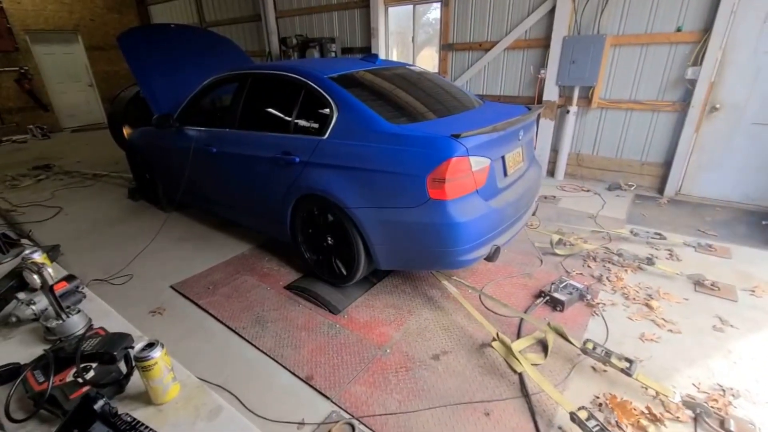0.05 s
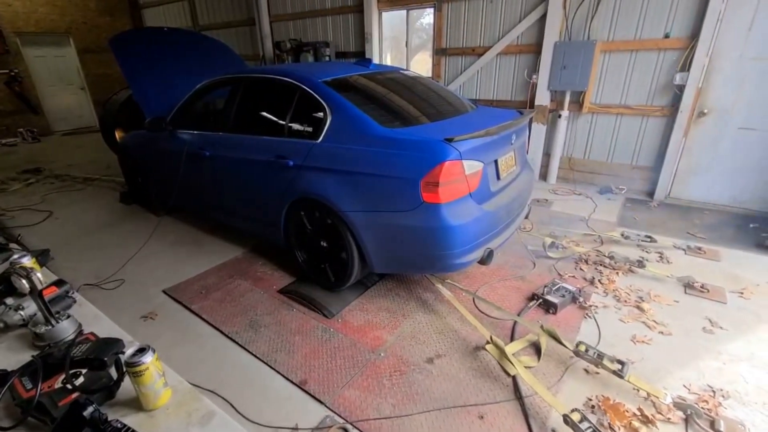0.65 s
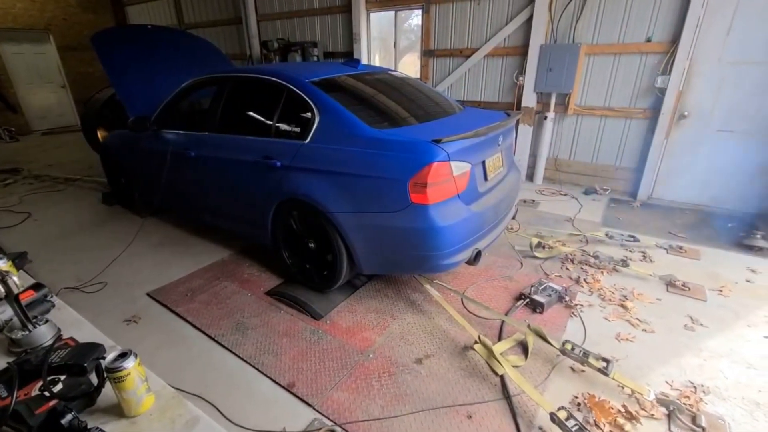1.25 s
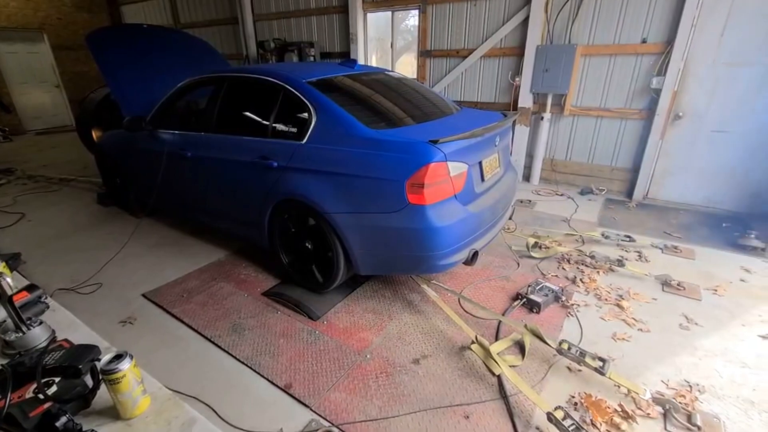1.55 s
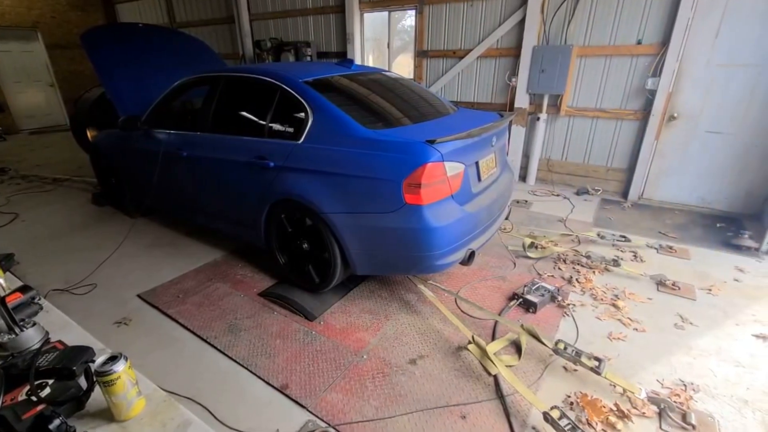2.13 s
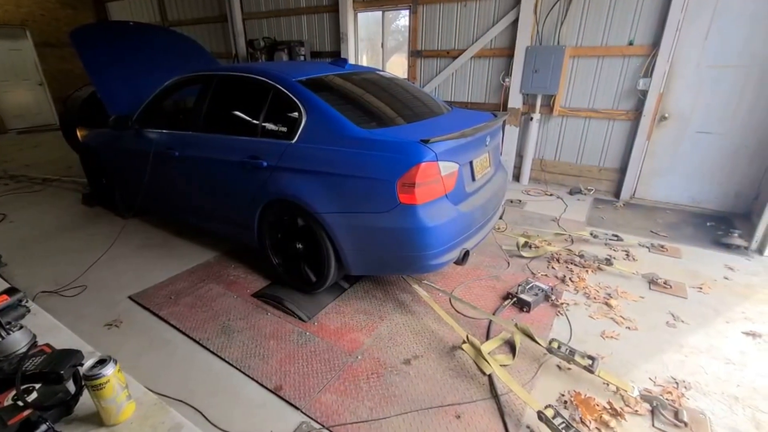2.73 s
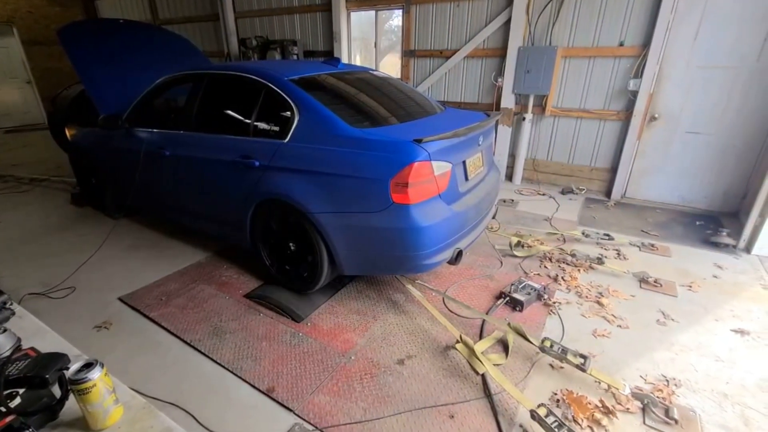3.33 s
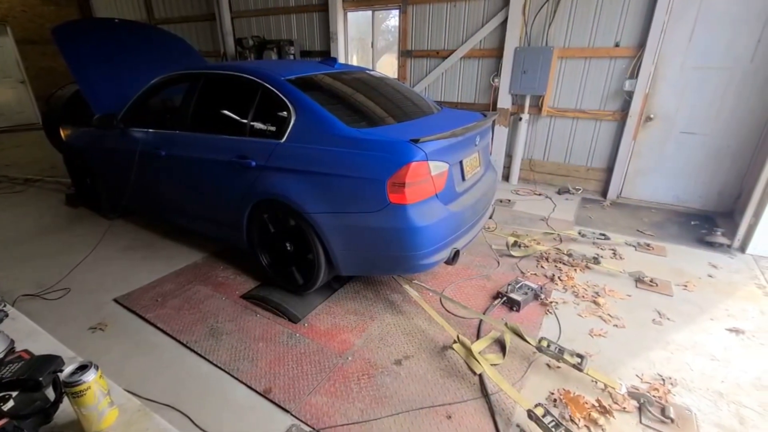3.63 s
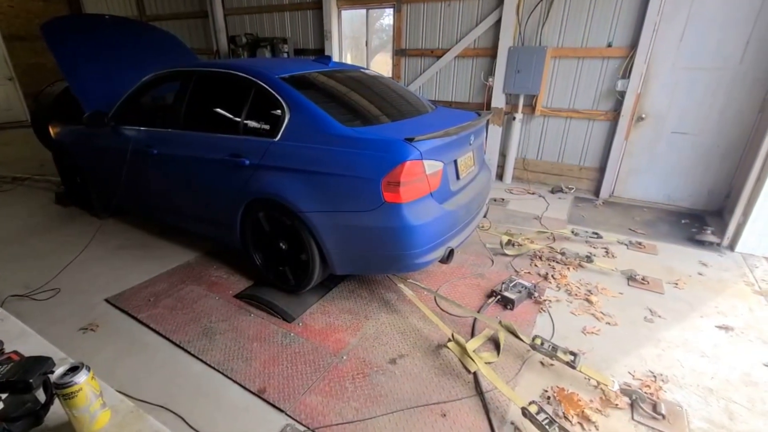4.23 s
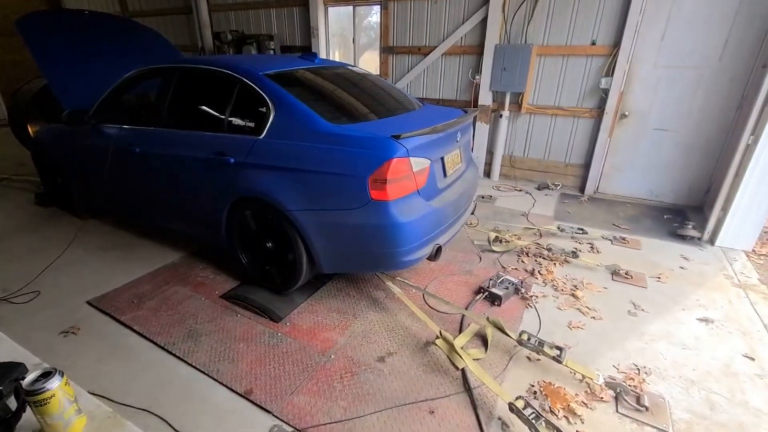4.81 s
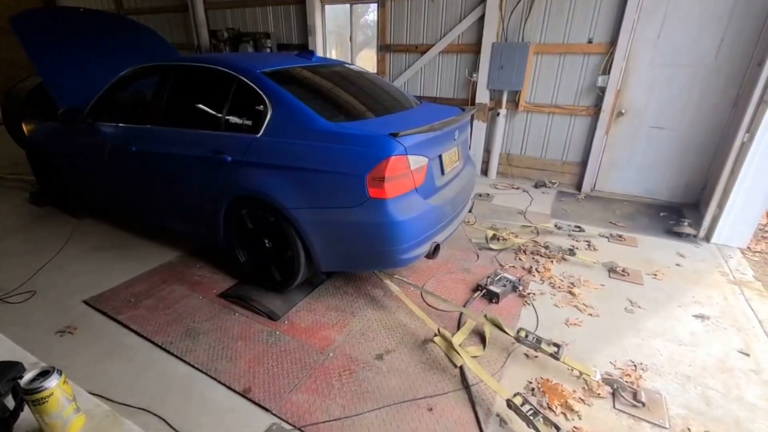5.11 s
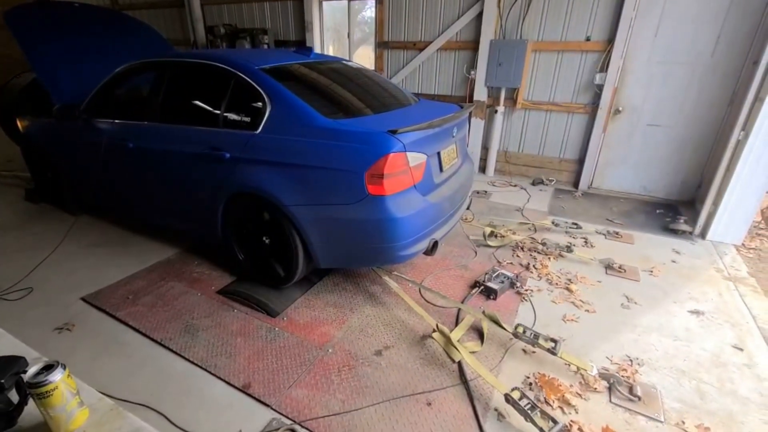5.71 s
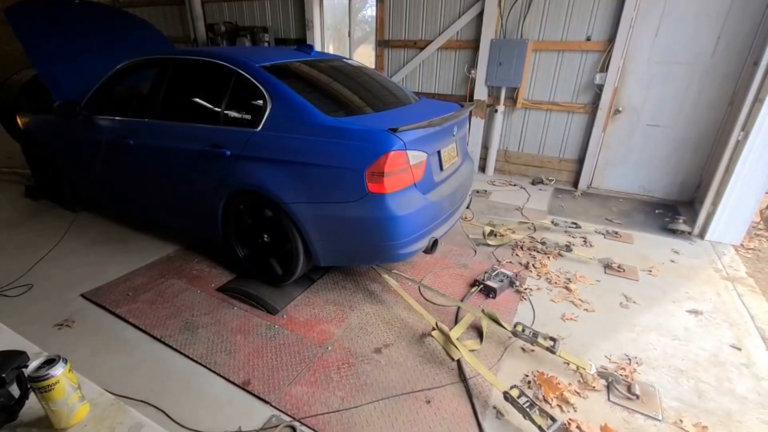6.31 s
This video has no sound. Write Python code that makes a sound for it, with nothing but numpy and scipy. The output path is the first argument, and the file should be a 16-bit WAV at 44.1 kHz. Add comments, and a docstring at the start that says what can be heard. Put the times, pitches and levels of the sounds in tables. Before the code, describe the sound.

A turbocharged car engine runs throughout on test rollers inside a metal shed, heard close to the tailpipe. The exhaust is deep, booming and burbling, with resonances that swell as the pitch moves. From the start the revs rise, with a hard rasp, to a peak at about 1.1 seconds, then sag until 1.7 seconds. They rise again, rasping, to about 2.7 seconds and drop quickly to their lowest near 3.2 seconds. From there the engine climbs slowly and steadily under load, growing raspier toward the end. A soft hiss of intake air, rollers and puffing exhaust gas lies underneath, along with a faint, high, airy turbo whistle that is strongest between roughly 2.4 and 5 seconds. At about 6 seconds a short chuff opens into a brighter rush of air, which continues over the still-rising engine until about 6.4 seconds.

```python
"""A metal shed, microphone hand-held beside the tailpipe of a turbocharged straight-six on a chassis dyno.
The revs flare and sag twice, then climb steadily under load. The firing orders boom through the
standing waves of pipe and shed, uneven cylinders burble, and the exhaust rasps with the throttle.
Gas puffs from the pipe over the hiss of intake and rollers and a faint turbo whistle.
Near the end a rush of boost air breaks in with a chuff."""
import sys
import numpy as np
from scipy import signal
from scipy.fft import rfft, irfft
from scipy.io import wavfile
from scipy.ndimage import uniform_filter1d

SR = 44100
rng = np.random.default_rng(int(sys.argv[2]) if len(sys.argv) > 2 else 0)


def wrap_up_sound(samples):
    """Save the sound to the file named by the first command line argument, as 16-bit audio."""
    columns = np.atleast_2d(samples).T
    # keep every value between -1 and 1, then stretch to whole-number steps
    tamed = np.clip(columns, -1, 1)
    steps = np.round(tamed * 32767).astype(np.int16)
    wavfile.write(sys.argv[1], SR, steps)


N = 280476
TIME = np.arange(N) / SR
BINS = np.fft.rfftfreq(N, 1 / SR)

# engine speed, six firings to a cycle: time_s, firing_hz
FIRING_RATE = [(0.0, 82.8), (0.43, 97.96), (0.85, 114.5), (0.95, 117.1), (1.14, 122.3), (1.32, 115.4),
               (1.5, 97.7), (1.69, 90.9), (2.09, 100.5), (2.15, 101.9), (2.67, 112.1), (2.75, 110.9),
               (3.09, 82.7), (3.17, 79.77), (3.34, 81.82), (4.25, 85.63), (4.76, 90.78), (5.63, 98.38),
               (6.36, 105.8)]
# throttle, as the level it gives the rasp: time_s, level_db
THROTTLE = [(0.0, -34), (0.2, -30), (0.52, -31.5), (0.7, -25), (0.95, -26), (1.3, -31), (1.55, -31.7),
            (2.05, -32), (2.32, -25.5), (2.85, -25), (3.15, -31), (4.35, -31.3), (4.7, -28.2), (4.9, -31.5),
            (5.17, -29), (5.42, -31.9), (5.75, -29), (5.98, -25.4), (6.36, -24)]
# colour of gas leaving the tailpipe: frequency_hz, gain_db
JET_COLOUR = [(1200, -0.5), (1900, -5.5), (2300, -2), (3000, -7.5), (3700, -9.5), (4600, -19), (7000, -55)]
# colour of intake and rollers before the long pull: frequency_hz, gain_db
HISS_COLOUR = [(2500, -1), (4600, -1.5), (5800, 0.5), (6900, 2), (7400, -8), (8000, -5), (8600, -3),
               (9100, 5.5), (9700, 0.5), (10400, 3), (12100, 0), (12900, 0.5), (14500, -1.5), (15800, -23)]


def amp(db):
    """Decibels to gain."""
    return 10 ** (np.asarray(db) / 20)


def unit(x):
    """Scales to rms 1."""
    return x / np.sqrt(np.mean(x ** 2) + 1e-20)


def curve(rows):
    """A time table, at every sample."""
    return np.interp(TIME, *np.transpose(rows))


def across(points):
    """A frequency table, at every bin."""
    hz, value = np.transpose(points)
    return np.interp(np.log(BINS + 1), np.log(hz), value)


def wander(hz):
    """Random drift of rms 1, up to about the given rate."""
    return unit(irfft(rfft(rng.standard_normal(N)) * np.exp(-(BINS / hz) ** 2), N))


def noise_pair():
    """Two independent white noises."""
    return rng.standard_normal((2, N))


def resonances(modes):
    """Gain at every bin of a set of modes, added in power."""
    return np.sqrt(sum(amp(db) ** 2 / (1 + 2 * ((BINS - hz) / width) ** 2) ** 2
                       for hz, width, db in modes))


def ring(x, gain):
    """Filters at minimum phase, so that each resonance builds up and rings on."""
    cepstrum = irfft(np.log(gain + amp(-90)), N)
    causal = cepstrum * (1 + np.sign(np.fft.fftfreq(N)))
    response = irfft(np.exp(rfft(causal)), N)[:SR // 2]
    running = np.pad(x, ((0, 0), (len(response) - 1, 0)), "reflect")  # already ringing at the start
    return signal.oaconvolve(running, response[None], "valid", axes=1)


def microphone(pair, colour, left_db=0):
    """Colours a direct and a scattered wave and spreads them over two ports; the middle has rms 1."""
    # how alike left and right are: frequency_hz, coherence
    port_likeness = [(100, 1), (350, .96), (600, .72), (1100, .65), (2200, .48), (4500, .45), (9000, .64),
                     (15000, .68)]
    # left level over right: frequency_hz, balance_db
    port_balance = [(100, -2), (200, 6), (380, -7), (650, 3), (1200, 0), (2300, -1), (4500, 3), (8500, 1),
                    (12000, 8), (15000, 7.5)]
    # the left port hears the car a little later: frequency_hz, lag_rad
    port_lag = [(20, .015), (100, .08), (380, .29), (1000, .62), (2300, 1.45), (4400, 1.8), (9000, 1.5),
                (15000, 1.55)]
    direct, scattered = rfft(pair) * colour
    likeness = np.clip(across(port_likeness), 0, 1)
    lean = amp((across(port_balance) + left_db) / 2)
    shared = np.sqrt((1 + likeness) / 2) * direct
    apart = np.sqrt((1 - likeness) / 2) * scattered
    left = (shared + apart) * lean * np.exp(-1j * across(port_lag))
    right = (shared - apart) / lean
    stereo = irfft(np.array([left, right]), N)
    return stereo / np.sqrt(np.mean(stereo.mean(0) ** 2))


def reflections(x, strength, nearest_s=0.0012, farthest_s=0.009, sway_s=4e-5, count=10):
    """Echoes off floor, car and walls comb the sound; the comb drifts as the microphone sways."""
    hz, frame_s, spectra = signal.stft(x, SR, nperseg=2048, noverlap=1536)
    comb = 1
    for delay_s in np.geomspace(nearest_s, farthest_s, count):
        path_s = delay_s * rng.uniform(0.9, 1.1) + sway_s * np.interp(frame_s, TIME, wander(hz=0.5))
        comb = comb + strength / np.sqrt(count) * np.exp(-2j * np.pi * hz[:, None] * path_s)
    combed = signal.istft(spectra * comb, SR, nperseg=2048, noverlap=1536)[1]
    return combed[:, :N] / np.sqrt(1 + strength ** 2)


def rev_sweep(fast_hz_per_s=70):
    """How quickly the revs are changing, 0-1."""
    slope = uniform_filter1d(abs(np.gradient(curve(FIRING_RATE))) * SR, size=6000)
    return np.clip(slope / fast_hz_per_s, 0, 1)


def boom(firings, left_db=-1.96, left_lag_s=0.00015, sharpen=0.06, flutter=0.09, sweep_flutter=0.065):
    """Clean firing orders swell through the standing waves; in quick sweeps they beat with their echo."""
    # clean orders at the tailpipe: firing_multiple, level_db
    orders = [(1, 1), (1.5, -13.5), (2, 3.5), (3, -0.4), (3.5, -7.5), (4, -0.3), (4.5, -9.5), (5, -8),
              (6, -12), (7, -11), (8, -8)]
    # standing waves of pipe and shed: pitch_hz, width_hz, gain_db
    standing_waves = [(85.4, 13.3, -12.5), (97.6, 6.2, -16.5), (105.84, 4.1, -12.5), (115.5, 8.4, -12.5),
                      (164.2, 8, -31), (182.4, 9.8, -28), (202, 6.8, -33.5), (232.8, 5.2, -20.5),
                      (241, 9.6, -15.5), (256, 16, -21), (275.9, 7.2, -21), (342, 11, -29),
                      (360.5, 6.5, -15.5), (384.3, 11.1, -13), (442, 51, -31), (496.5, 18, -24),
                      (576.4, 20, -28), (629, 10.6, -19), (780, 48, -33.5), (859.3, 21, -27.5)]
    # the bass cancels against its own echo near the top of the revs: pitch_hz, width_hz, echo_db
    dead_spot = [(121.2, 3.9, -4)]
    at_ports = firings - np.array([[left_lag_s], [0]]) * curve(FIRING_RATE)
    sweeping = rev_sweep()
    push_db = curve(THROTTLE) - curve(THROTTLE).mean()
    tones = np.zeros((2, N))
    for multiple, level_db in orders:
        depth = flutter + sweep_flutter * multiple * sweeping
        echo = depth * (wander(hz=22) + 1j * wander(hz=23.6)) / np.sqrt(2)
        cycles = multiple * at_ports + (multiple - 1) * rng.random()
        wave = (1 + echo) / np.sqrt(1 + depth ** 2) * np.exp(2j * np.pi * cycles)
        lift_db = sharpen * (multiple - 1) * push_db  # throttle brings out the high orders
        tones += np.sqrt(2) * amp(level_db + lift_db) * wave.real
    shed = resonances(standing_waves) * abs(1 - resonances(dead_spot))
    return ring(tones, shed) * amp(np.array([[left_db], [-left_db]]) / 2)


def cylinder_pattern(firings, bank_db, firing_db, bass_db=-14, drift_rad=0.42, size=4096, count=130):
    """The pressure pattern of six unequal cylinders, repeated every engine cycle and slowly changing."""
    line = np.arange(count)
    # two banks of three alternate, so every third line stands out; those between fade toward the bass
    between_db = bass_db * np.clip(1 - line / 26, 0, 1)
    height = amp(np.where(line % 3, between_db, np.where(line % 2, bank_db, firing_db)))
    height[(line % 6 == 0) & (line <= 24)] = 0  # the first four firing orders belong to the boom
    shapes = irfft(height * np.exp(2j * np.pi * rng.random((2, count))), size)
    place = firings / 6 % 1 * size
    steady, other = (np.interp(place, np.arange(size + 1), np.append(s, s[0])) for s in shapes)
    turn = drift_rad * wander(hz=3.14)
    return unit(np.cos(turn) * steady + np.sin(turn) * other)


def puffs(firings, surge, bank_surge):
    """Turbulence that surges with every firing and with every swing between the banks."""
    flow = 1 + surge * np.cos(2 * np.pi * firings) + bank_surge * np.cos(np.pi * firings)
    return unit(flow * noise_pair())


def exhaust(firings, rough, bank_db, firing_db, surge, bank_surge):
    """Cylinder pressure mixed with low-passed puffs; rough is the puffs' share of the power."""
    pressure = np.array([cylinder_pattern(firings, bank_db, firing_db) for _ in range(2)])
    lowpass = signal.butter(4, 2200, fs=SR, output="sos")
    turbulence = unit(signal.sosfilt(lowpass, puffs(firings, surge, bank_surge)))
    return np.sqrt(1 - rough) * pressure + np.sqrt(rough) * turbulence


def burble(firings, gain_db=-9.5, throttle_share=0.49, steady_rough=0.13, sweep_rough=0.2):
    """Uneven cylinders ring the low resonances, harder with the throttle and smeared in a quick sweep."""
    # low resonances of pipe and shed: pitch_hz, width_hz, gain_db
    low_modes = [(55, 17, -4.5), (114, 28, -4.5), (176, 58, -9.5), (260, 48, -7), (287.4, 18.3, 1.5),
                 (359.7, 8.5, 1), (384.1, 24, 2.5), (416, 32, -16), (454.5, 11, -1), (490.8, 9.8, 0.5),
                 (540, 54, -10)]
    rough = steady_rough + sweep_rough * rev_sweep()
    drive = exhaust(firings, rough, bank_db=0, firing_db=1, surge=0.18, bank_surge=0.1)
    return amp(throttle_share * curve(THROTTLE) + gain_db) * microphone(drive, resonances(low_modes))


def rasp(firings):
    """The hard edge of the exhaust, which grows with the throttle and bounces round the shed."""
    # tailpipe and sheet-metal walls ringing: pitch_hz, width_hz, gain_db
    metal_modes = [(598, 49, -4.5), (631.6, 13, 4), (700, 20, -2), (775, 54, 3), (874, 51, 2),
                   (942, 44, -2.5), (1015, 26, 3), (1096, 60, -1), (1235, 47, -4.5), (1323, 37, -6.5),
                   (1470, 67, -10.5), (1643, 134, -10.5), (1830, 79, -19)]
    # smeared at low revs, clearing into a pitched growl as they rise: firing_hz, turbulent_share
    roughness = [(80, 0.48), (102, 0.34), (116, 0.15)]
    rough = np.interp(curve(FIRING_RATE), *np.transpose(roughness))
    drive = exhaust(firings, rough, bank_db=6, firing_db=6, surge=0.69, bank_surge=0.48)
    edge = microphone(drive, resonances(metal_modes))
    return amp(curve(THROTTLE)) * reflections(edge, strength=0.31, nearest_s=0.006764, farthest_s=0.016)


def tailpipe_jet(firings, gain_db=6):
    """Gas tearing out of the tailpipe in puffs, close to the microphone."""
    # strength of the jet: time_s, relative_db
    jet_flow = [(0.05, -37.5), (0.85, -45), (1.16, -55.5), (2.7, -44.5), (5.78, -48), (5.92, -42.5),
                (5.99, -37.5), (6.27, -50), (6.3, -38)]
    gas = microphone(puffs(firings, surge=0.3, bank_surge=0.21), amp(across(JET_COLOUR)))
    spray = reflections(gas, strength=0.49, nearest_s=0.0026, farthest_s=0.015)
    return amp(curve(jet_flow) + gain_db) * spray


def air_hiss(gain_db=1, boost_db=1.86, flicker_db=0.56):
    """Hiss of intake and rollers, handing over to the rush of boost air near the end."""
    # strength of all the moving air: time_s, relative_db
    air_flow = [(0.05, -37.5), (1.06, -38.5), (1.16, -40), (4.77, -37.5), (5.83, -38.5), (5.99, -31),
                (6.3, -31.5)]
    # the hiss blooms into a higher colour as the pull goes on: time_s, power_share
    pull_share = [(3.2, 0.04), (4.2, 0.17), (4.4, 0.86), (4.9, 1), (5.8, 0.55)]
    # colour of the hiss under load: frequency_hz, gain_db
    pull_colour = [(2500, -4), (4600, -3), (6500, 1), (6900, 2), (7400, -4), (8100, -4), (9100, -4),
                   (9600, 1), (10900, -1.5), (11800, 6), (12500, 0), (13200, -5), (14500, -7), (15800, -21)]
    # boost air in the blend: time_s, share
    boost_share = [(5.82, 0.25), (5.92, 0.28), (5.97, 1), (6.36, 0.99)]
    # colour of the boost air: frequency_hz, gain_db
    boost_colour = [(2500, -3), (4200, -8), (5000, -9), (5900, -6), (6500, -9), (7300, -12), (8000, 0.5),
                    (8900, 1), (9600, -13), (10700, -9), (11300, -6), (12200, -4), (12900, -12),
                    (15800, -12.5)]
    pull, boost = curve(pull_share), curve(boost_share)
    early = microphone(noise_pair(), amp(across(HISS_COLOUR)))
    loaded = microphone(noise_pair(), amp(across(pull_colour)))
    rush = microphone(noise_pair(), amp(across(boost_colour)), left_db=5)
    hiss = np.sqrt(1 - pull) * early + np.sqrt(pull) * loaded
    blend = np.sqrt(1 - boost) * hiss + np.sqrt(boost) * amp(boost_db) * rush
    level_db = curve(air_flow) + gain_db + flicker_db * wander(hz=25)
    return amp(level_db) * reflections(blend, strength=0.46)


def turbo_whistle():
    """Fast air sings faintly in the charge pipes."""
    # the whistle as the turbo spools: time_s, level_db
    spool = [(0, -52), (2, -52), (2.4, -44.5), (3.1, -46), (3.33, -39.5), (3.6, -44.5), (4.1, -43.5),
             (4.7, -43.5), (5.4, -48), (6.36, -53)]
    # its airy bands: pitch_hz, width_hz, gain_db
    whistle_bands = [(7920, 34, -5.5), (8540, 170, -2), (9120, 250, -2.5), (10200, 130, -8),
                     (13000, 180, -9), (14700, 350, -12)]
    return amp(curve(spool)) * microphone(noise_pair(), resonances(whistle_bands))


def chuff(peak_s=5.985, spread_s=0.046, level_db=-38, sizzle_db=-4):
    """A short spurt of gas as the rush of boost air opens."""
    colour = amp(across(JET_COLOUR)) + amp(across(HISS_COLOUR) + sizzle_db)
    swell = np.exp(-((TIME - peak_s) / spread_s) ** 2 / 2)
    return amp(level_db) * swell * microphone(noise_pair(), colour)


def scene(jitter=0.0056, shudder=0.027):
    """One crankshaft, a little unsteady and shuddering in quick sweeps, drives all the exhaust layers."""
    firings = np.cumsum(curve(FIRING_RATE)) / SR  # running count of firings
    firings += jitter * wander(hz=21.5) + shudder * rev_sweep() * wander(hz=11)
    tailpipe = boom(firings) + burble(firings) + rasp(firings) + tailpipe_jet(firings)
    return tailpipe + air_hiss() + turbo_whistle() + chuff()


def record(dry, edge_hz=15750):
    """The recorder's band limit cuts off the highest treble."""
    lowpass = signal.firwin(1023, edge_hz, window=("kaiser", 9), fs=SR)
    return signal.oaconvolve(dry, lowpass[None], "same")


dry = scene()
out = record(dry)
wrap_up_sound(out)
```